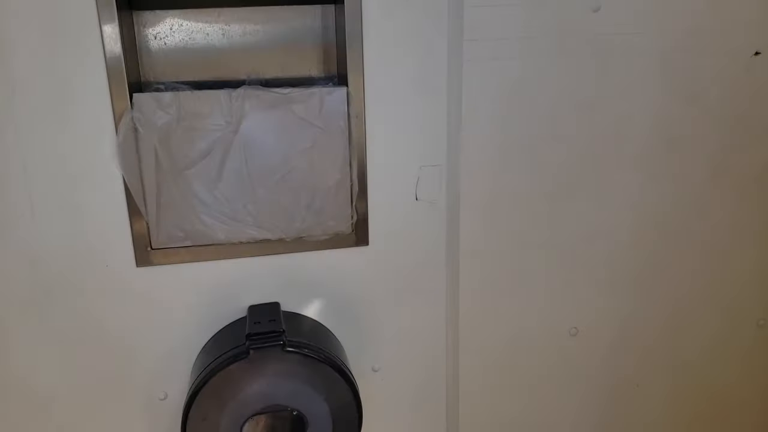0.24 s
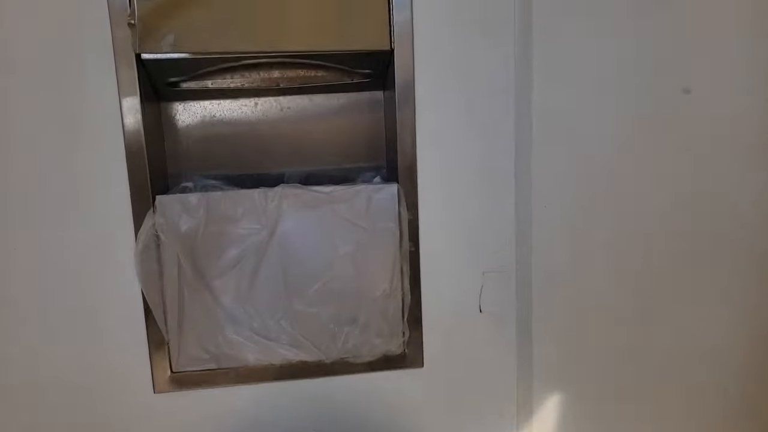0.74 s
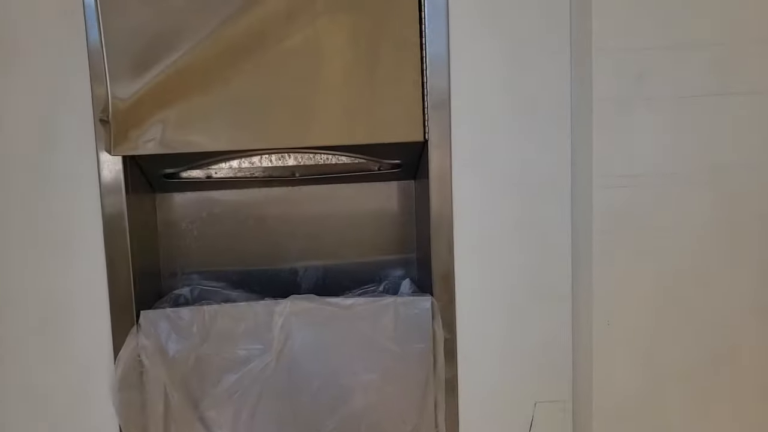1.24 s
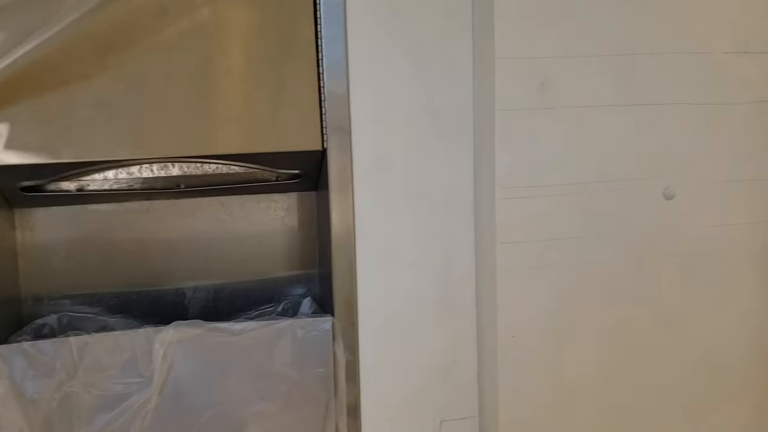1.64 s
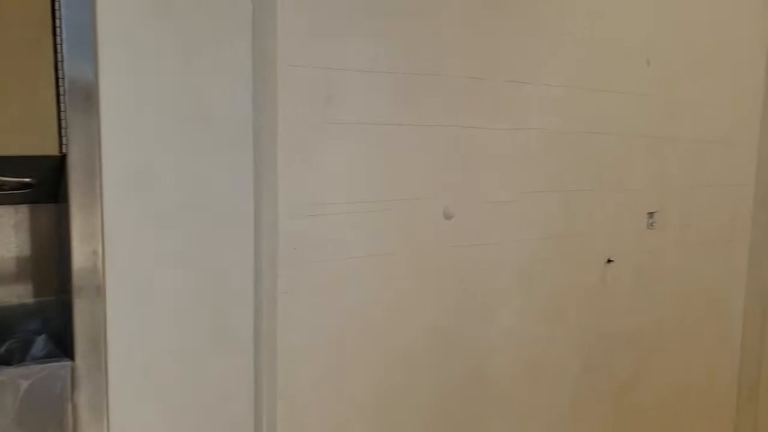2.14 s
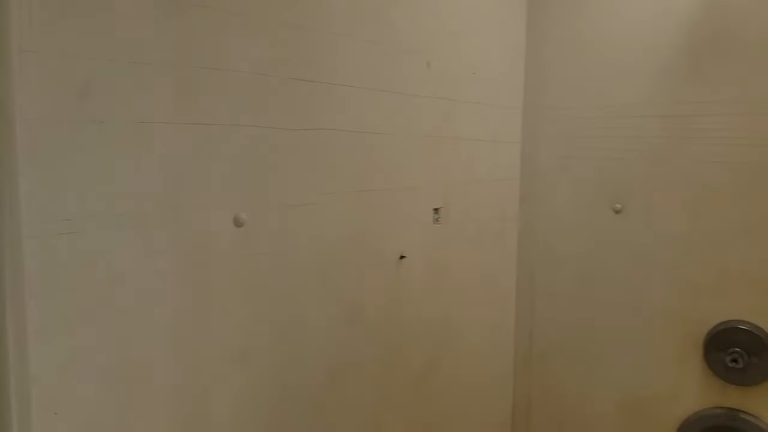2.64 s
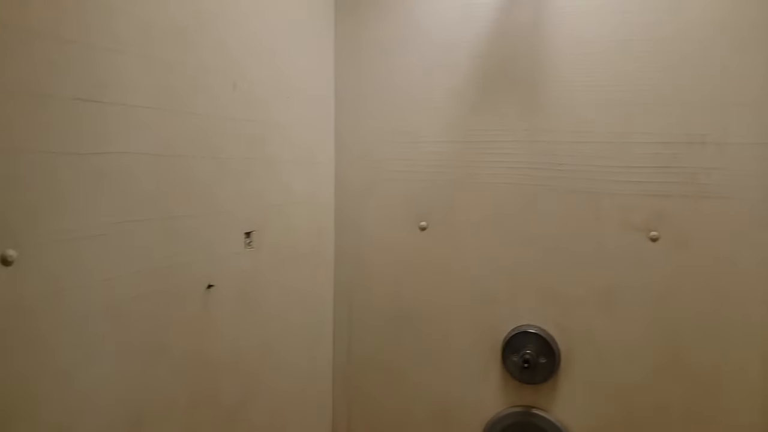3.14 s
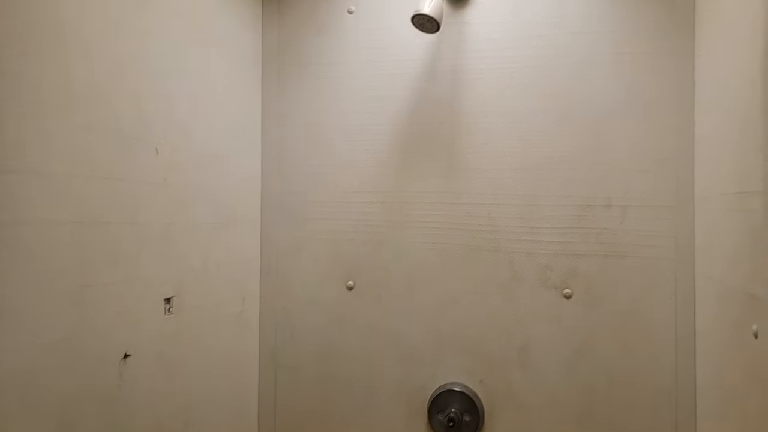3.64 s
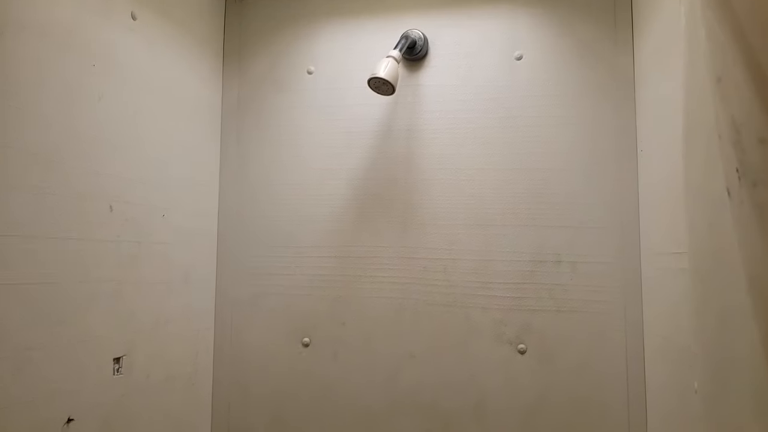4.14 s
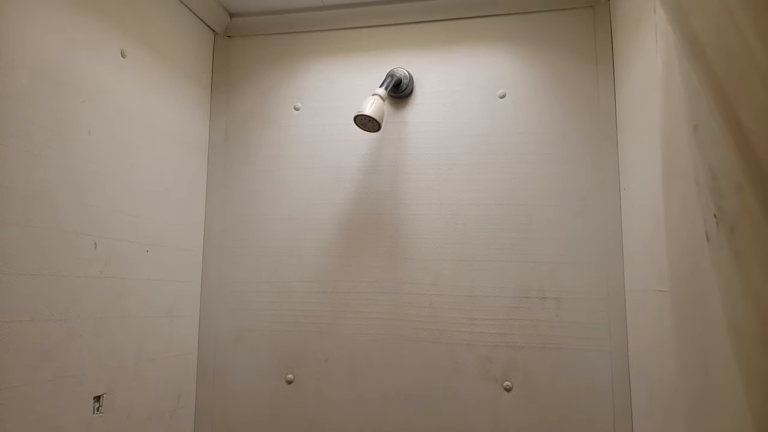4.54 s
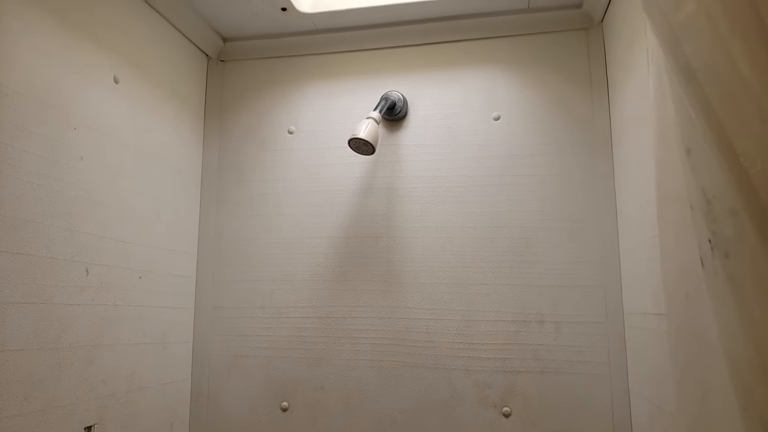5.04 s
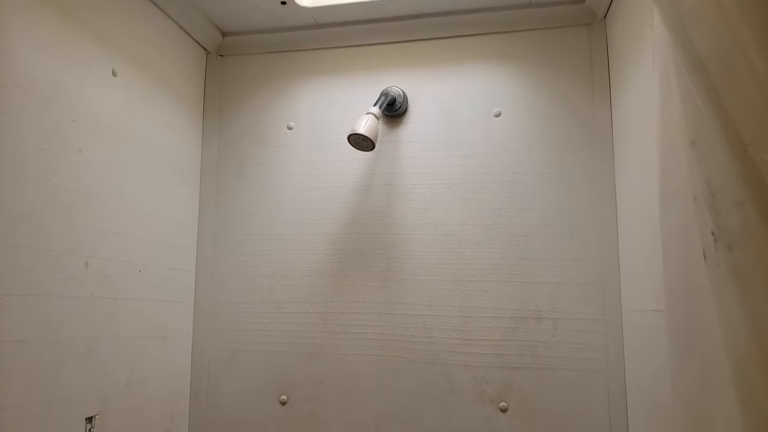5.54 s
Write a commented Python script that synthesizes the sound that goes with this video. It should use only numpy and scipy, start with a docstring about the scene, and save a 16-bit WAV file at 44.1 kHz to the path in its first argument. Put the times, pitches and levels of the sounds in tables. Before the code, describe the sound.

Handheld stereo pickup, close and slightly hissy, in a small reflective shower stall with a steady fan drone. Someone steps up with thumps, small knocks and rustling fabric, then sweeps the curtain aside in about half a second: swish, scraping, a burst of ring clacks, and a loud booming slap on the wall panel. A short ring fades into humming and faint movement.

```python
"""Sweeping a shower curtain aside

Under a humming fan, someone steps up to a shower stall with rustling clothes and sweeps the curtain aside.
The rings scrape and clack along the rod, the sheet swishes, and the bunched curtain knocks on the wall.
Rubbing is noise made of tiny slips, knocks are short bursts of contacts, and hums and booms are sine waves.
The small hard room rings around a hand-held pair of microphones."""
import sys
import numpy as np
from scipy import signal
from scipy.fft import rfft, irfft
from scipy.io import wavfile
from scipy.ndimage import uniform_filter1d

SR = 44100
rng = np.random.default_rng(int(sys.argv[2]) if len(sys.argv) > 2 else 0)


def generate_wav(sig):
    """Save sig (samples, or channels by samples) to the path in sys.argv[1] as 16-bit PCM at SR."""
    pcm = np.round(np.clip(np.atleast_2d(sig).T, -1, 1) * 32767).astype(np.int16)
    wavfile.write(sys.argv[1], SR, pcm)


N = 255780
TIME = np.arange(N) / SR  # s


def amp(db):
    """Turns decibels into gain."""
    return 10 ** (np.asarray(db) / 20)


def evened(x):
    """Scales a sound to rms 1."""
    return x / np.sqrt(np.mean(x ** 2) + 1e-20)


def read(points, hz):
    """Reads a curve over frequency at hz, with straight lines between its points on a log axis."""
    f, value = np.transpose(points)
    return np.interp(np.log(hz + 1), np.log(f + 1), value)


def add(mix, s, sound):
    """Lays a sound into the mix at time s."""
    part = mix[round(s * SR):][:len(sound)]
    part += sound[:len(part)]


def drift(rate_hz):
    """A random wander of rms 1: noise that keeps little above rate_hz."""
    hz = np.fft.rfftfreq(N, 1 / SR)
    spectrum = rfft(rng.standard_normal(N)) * np.exp(-(hz / rate_hz) ** 2)
    return evened(irfft(spectrum, N))


def diffuse(size=N):
    """Spectra of noise from all sides: the two microphones agree mainly in the bass."""
    spacing_m, sound_m_s = .15, 343
    hz = np.fft.rfftfreq(size, 1 / SR)
    same = np.sinc(2 * hz * spacing_m / sound_m_s) * .97
    mid, side = rfft(rng.standard_normal((2, size))) * np.sqrt([1 + same, 1 - same])
    return hz, np.array([mid + side, mid - side])


def causal(db):
    """The promptest response with this spectrum (minimum phase), energy 1."""
    both_sides_db = np.r_[db, db[-2:0:-1]]
    log_gain = np.log(amp(both_sides_db))
    taps = np.fft.ifft(np.exp(np.conj(signal.hilbert(log_gain)))).real
    return taps / np.linalg.norm(taps)


def room(x, lag_ms, wet_db, near_db, near_s=0.0061, left_db=7.0, count=5):
    """Sound arrives directly, then off the walls as a dying noise whose pattern shifts at random.

    A positive lag_ms delays the left microphone, a negative one the right."""
    # how long the room rings: f/Hz, time to fall 60 dB/s
    ring_times = [(100, 0.37), (400, 0.11), (1000, 0.21), (2500, 0.44), (5000, 0.47), (12000, 0.49)]
    t = np.arange(SR // 2) / SR
    direct = np.zeros((2, len(t)))
    direct[0, round(max(lag_ms, 0) * SR / 1000)] = amp(left_db)
    direct[1, round(max(-lag_ms, 0) * SR / 1000)] = amp(-left_db)
    out = signal.fftconvolve(x[None], direct, axes=1)[:, :N]

    # several wall patterns take turns, each with its own wandering share of the sound
    shares = np.array([drift(12) for _ in range(count)])
    for share in shares / np.linalg.norm(shares, axis=0):
        noise = irfft(diffuse(size=len(t))[1])
        f, age, frames = signal.stft(noise, SR, nperseg=256)
        fading = frames * amp(-60 * age / read(ring_times, f)[:, None])
        tail = signal.istft(fading, SR)[1][:, :len(t)]
        near = irfft(diffuse(size=len(t))[1]) * np.exp(-t / near_s)
        late_part = amp(wet_db) * evened(tail * (t > .004))
        early_part = amp(near_db) * evened(near * (t > .0015))
        walls = (late_part + early_part) / np.sqrt(len(t))
        out += signal.fftconvolve((x * share)[None], walls, axes=1)[:, :N]
    return out / np.sqrt(1 + amp(wet_db) ** 2 + amp(near_db) ** 2)


def friction(colour, per_s, spread_db, smooth):
    """Rubbing surfaces: many tiny slips of uneven size over a smooth rub, rms 1."""
    happens = rng.random(N) < per_s / SR
    direction = rng.choice([-1, 1], N)
    size = amp(spread_db * np.minimum(rng.exponential(1, N), 4))
    drive = evened(happens * direction * size) + smooth * rng.standard_normal(N)
    colour_filter = causal(read(colour, np.linspace(0, SR / 2, 2049)))
    return evened(signal.oaconvolve(drive, colour_filter)[:N])


def blows(rows, colour, chatter, size=41):
    """Each blow is one contact and a dying chatter of smaller ones, coloured by the struck body."""
    out = np.zeros(N)
    hz = np.linspace(0, SR / 2, 2049)
    t = np.arange(4096) / SR
    for s, db, tilt_db, chatter_s, *tones in rows:
        contacts = rng.standard_normal(len(t)) * np.exp(-t / max(chatter_s, 1e-4))
        contacts *= chatter / np.linalg.norm(contacts)
        contacts[0] = 1
        body_db = read(colour, hz) + tilt_db * np.log2(np.maximum(hz, 200) / 2000)
        for tone_hz, width_hz, tone_db in np.reshape(tones, (-1, 3)):
            body_db += tone_db / (1 + (2 * (hz - tone_hz) / width_hz) ** 2)
        # the contacts' broad spectrum is evened out, so the broad colour is that of the struck body
        contact_power = uniform_filter1d(abs(rfft(contacts)) ** 2, size)
        contact_db = 10 * np.log10(contact_power)
        hit = signal.fftconvolve(contacts, causal(body_db - contact_db))
        add(out, s, amp(db) * hit / np.linalg.norm(hit))
    return out


def ring_modes(strikes, modes, rise_s):
    """A struck body's own tones (modes) swing up over rise_s at each strike and die away."""
    t = np.arange(SR) / SR
    out = np.zeros(N)
    swing = np.sin(np.pi / 2 * np.minimum(t / rise_s, 1)) ** 2
    tones = sum(amp(db - 60 * t / t60) * np.sin(2 * np.pi * hz * t) for hz, db, t60 in modes)
    for s, db in strikes:
        add(out, s, amp(db) * -swing * tones)
    return out


def swells(rows):
    """Gain of separate rubs, each rising to its peak and falling evenly in dB.

    A row gives the times to rise and fall by 10 dB, or one time for both; the least is 1 ms."""
    power = np.zeros(N)
    for s, db, *times in rows:
        span_s = np.where(TIME < s, times[0], times[-1])
        power += amp(db - 10 * abs(TIME - s) / np.maximum(span_s, 1e-3)) ** 2
    return np.sqrt(power)


def pull(attack_s, growth_db_per_s, release_db_per_s):
    """Gain of the pull: a quick start, a steady change with one snag, a fade once the curtain stops."""
    pull_s, stop_s = 2.419, 3.05
    # the pull slackens once on the way
    snag_s, snag_length_s, snag_depth_db = 2.695, 0.022, -3
    travel_s = np.clip(TIME, pull_s, stop_s) - pull_s
    snag_db = snag_depth_db * np.exp(-((TIME - snag_s) / snag_length_s) ** 2)
    fade_db = release_db_per_s * np.maximum(TIME - stop_s, 0)
    start = np.minimum(travel_s / attack_s, 1)
    return start * amp(growth_db_per_s * travel_s + snag_db - fade_db)


def ventilation():
    """Fan rumble, motor hum and blade tone; tones and air resonances change as the microphones move in."""
    # colour of the rumble: f/Hz, relative level/dB
    rumble_colour = [(15, -8.5), (30, -7), (55, -2.5), (100, -5.5), (150, -0.5), (205, -12), (400, -16),
                     (500, -23.5), (850, -25), (1150, -36), (2000, -46), (8000, -96)]
    # air resonances that the fan excites: f/Hz, width/Hz, level outside the stall/dB, level inside/dB
    air_modes = [(51, 3.9, -50, -61.5), (82.7, 11.6, -58, -51.5), (161.2, 8.1, -54, -53),
                 (337, 15.7, -62.5, -57.5), (764.2, 26.8, -82.5, -58)]
    # how far the microphones are inside the stall: t/s, share (0-1)
    inside_share = [(0, 0.34), (2.2, 0.78), (3.4, 0.94), (5.8, 0.97)]
    # the microphones pass through the standing waves of both tones: t/s, motor level/dB, blade level/dB
    hum_levels = [(0, -54, -44.5), (.8, -55, -48), (1.1, -48.5, -47.5), (3.2, -45.5, -54.5),
                  (4.3, -47.5, -58), (5.8, -50.5, -51.5)]
    motor_hz, blades_hz = 119.3, 170.75

    inside = np.interp(TIME, *np.transpose(inside_share))
    hz, noise = diffuse()
    rumble = evened(irfft(noise * amp(read(rumble_colour, hz)), N))
    out = amp(-46.5) * rumble * amp(.5 * drift(2.4))

    hz, noise = diffuse()
    for mode_hz, width_hz, out_db, in_db in air_modes:
        ringing = evened(irfft(noise / (1 + ((hz - mode_hz) / width_hz) ** 2), N))
        out += ringing * amp(out_db + (in_db - out_db) * inside)

    s, motor_db, blades_db = np.transpose(hum_levels)
    for tone_hz, waver_hz, db in ((motor_hz, .4, motor_db), (blades_hz, 1.0, blades_db)):
        pitch_hz = tone_hz + waver_hz * drift(4.77)
        tone = np.sin(2 * np.pi * np.cumsum(pitch_hz) / SR)
        out += evened(tone) * amp(np.interp(TIME, s, db))
    return out * amp([[.3], [-.3]])  # slightly louder on the left


def hiss():
    """Steady faint noise of each microphone, coloured by its own curve; the left one is much noisier."""
    # colour of each hiss: f/Hz, relative level/dB
    left_colour = [(1000, -17), (2000, -10), (2650, -1), (3200, -2.5), (4500, 3), (5800, 3.5), (7000, -10),
                   (8200, -48), (11000, -18.5), (16000, -18)]
    right_colour = [(1000, -6), (2000, -25), (2650, 12), (3300, -11), (6000, 6), (8200, -26), (11000, -3),
                    (16000, 5.5)]
    hz = np.fft.rfftfreq(N, 1 / SR)
    sides = []
    for colour, level_db in ((left_colour, -65), (right_colour, -80.0)):
        spectrum = rfft(rng.standard_normal(N)) * amp(read(colour, hz))
        sides.append(amp(level_db) * evened(irfft(spectrum, N)))
    return np.array(sides)


def rustling():
    """Clothes rub at each movement and soles shuffle: both are friction that swells and fades."""
    # colour of rubbing clothes, then of shuffling soles: f/Hz, relative level/dB
    cloth_colour = [(200, 2), (900, -16.5), (1600, -6), (2700, 9), (3500, 1.5), (5800, 10.5), (8200, -4),
                    (11500, 5), (16000, 0.5)]
    sole_colour = [(200, 10.5), (700, 8), (1500, 7.5), (2600, -2), (4000, 0.5), (8000, -48), (16000, -45.5)]
    # rustles, one for each movement: peak t/s, relative level/dB, 10 dB rise time/s, 10 dB fall time/s
    rustles = [(0, -69, 0.11, 0.2), (.52, -68.5, 0.08, 0.04), (.82, -67, 0.21, .4),
               (1.035, -60.5, 0.05, 0.06), (1.13, -68.5, 0.5, .25), (2.34, -70, 0.54, 0.38),
               (3.47, -77.5, 1, 0.38), (3.75, -82, .1, 0.6), (4.6, -78, 0.16, 0.13),
               (5.21, -83.5, 0.3, 0.5), (5.8, -79, 0.1, -5)]
    # shuffles of the feet: peak t/s, relative level/dB, time to rise or fall 10 dB/s
    shuffles = [(0, -67, .1), (.93, -61, 0.24), (1.3, -67.5, 0.2), (1.65, -59, 0.05), (1.97, -64, 0),
                (2.3, -58.5, 0.9), (3.5, -65, 0.47), (4.5, -70.5, 0.6), (5.27, -68.5, 0.35),
                (5.8, -63, 0.3)]
    clothes = amp(7.5) * swells(rustles) * friction(cloth_colour, per_s=1500, spread_db=3.0, smooth=0.91)
    feet = swells(shuffles) * friction(sole_colour, per_s=300, spread_db=1, smooth=0.74)
    return room(clothes + feet, lag_ms=.1, wet_db=4.5, near_db=14, left_db=9) * amp([[-.9], [.9]])


def footfalls():
    """Footfalls and knocks on the way are chattering contacts; heels set the floor's low tones booming."""
    # footfalls and knocks: t/s, relative level/dB, brightness/dB per octave, chatter decay/s,
    # body tone f/Hz, clack tone f/Hz, clack tone boost/dB
    steps = [(.493, -28, -1.4, 0.0029, 305, 2890, 11), (.509, -37, -0.1, 0.02, 534, 2980, 11),
             (1.6405, -39, .2, 0.0043, 470, 1640, 24), (1.7945, -37, 1.8, .0047, 910, 4900, 8.5),
             (1.807, -35, -2, .0024, 930, 1700, 21.5), (1.838, -38.5, 0, 0.0023, 110, 1730, 14),
             (2.274, -52.5, 4.5, .0064, 1620, 2430, 20)]
    # colour of a footfall: f/Hz, relative level/dB
    step_colour = [(60, -4), (250, 5.5), (500, -1.5), (900, -1), (1500, -20), (2000, -22.5), (3000, -23),
                   (4000, -25), (6300, -24), (8200, -41), (16000, -45)]
    # heels landing: t/s, relative level/dB
    heels = [(.495, -4.5), (.725, 0), (1.47, 3.5), (1.83, 2.5), (2.17, 1.5)]
    # the floor's boom: f/Hz, relative level/dB, time to fall 60 dB/s
    floor_modes = [(32.8, -47, 0.27), (51.4, -32.5, 0.19), (78.6, -42, 0.14)]
    # the body tone's width is a share of its pitch
    body_width, body_db, clack_width_hz = 0.34, 8.5, 1160
    knocks = []
    for s, db, tilt_db, chatter_s, body_hz, clack_hz, clack_db in steps:
        body_tone = (body_hz, body_width * body_hz, body_db)
        clack_tone = (clack_hz, clack_width_hz, clack_db)
        knocks.append((s, db, tilt_db, chatter_s, *body_tone, *clack_tone))
    impacts = amp(25.5) * blows(knocks, step_colour, chatter=0.71)
    floor = ring_modes(heels, floor_modes, rise_s=0.01)
    return floor + room(impacts, lag_ms=-0.34, wet_db=0.5, near_db=4.0, near_s=0.021, left_db=1.5)


def curtain_sheet():
    """The sheet swishes as friction, fading as it folds up, and its folds flap."""
    # colour of the swish: f/Hz, relative level/dB
    sheet_colour = [(150, 3), (600, 10), (1300, 6.5), (2500, 0.5), (5500, 1.5), (8200, -7), (12000, -1),
                    (16000, -9)]
    # folds flap on the way and as the sheet swings out:
    # peak t/s, relative level/dB, 10 dB rise time/s, 10 dB fall time/s (below 0.001 counts as 0.001)
    flaps = [(2.8145, -45, 0, 0.0073), (3.17, -59.5, -0.32, 0.07), (3.272, -58, -0.56, -0.07)]
    sweep = amp(-53.5) * pull(attack_s=0.077, growth_db_per_s=-4, release_db_per_s=60)
    swish = np.hypot(sweep, swells(flaps))
    sheet = amp(5.5) * swish * friction(sheet_colour, per_s=2300, spread_db=3.5, smooth=0.99)
    return room(sheet, lag_ms=.1, wet_db=5, near_db=17.5, left_db=8.0) * amp([[-.5], [.5]])


def curtain_rings():
    """Rings scrape and tick along the rod, louder as they gather, and skid on after each clack."""
    # colour of scraping along the rod, then of a struck ring: f/Hz, relative level/dB
    scrape_colour = [(150, -12), (400, -3), (800, 11.5), (1300, 2.5), (1900, 1), (2450, -15), (3200, -4),
                     (4600, -11), (6300, -5), (8000, -52), (16000, -39)]
    ring_colour = [(200, 0.5), (800, -1), (1700, -4.5), (2300, 2.5), (3300, -1.5), (4400, 1.5), (5900, -6),
                   (7200, -12.5), (8300, -26), (16000, -32)]
    # rings clacking: t/s, relative level/dB, brightness/dB per octave, ring tone f/Hz, ring tone boost/dB
    clack_rows = [(2.5533, -38, -2, 2470, 11.5), (2.6066, -30, 3.5, 2400, 1.5),
                  (2.6551, -25, 0.5, 2600, 8.5), (2.712, -32, -3.5, 1800, 4), (2.7400, -24, 0, 2320, 2),
                  (2.7668, -30, -1.5, 2140, -7), (2.814, -25.5, 1.5, 2500, 2.5),
                  (2.8464, -27.5, -2, 2610, 9), (2.9256, -34, -4, 2460, 13), (2.9487, -38, 2, 2400, 14),
                  (2.9695, -37, 2, 2560, 14), (2.9818, -29, -1, 1920, 16)]
    # a skid's level is set against its clack; its fall time is for 10 dB
    skid_db, skid_fall_s = -18.5, 0.072
    # a clean clack rings out, a dull one chatters longer: each 10 dB of tone halves the chatter
    base_chatter_s, halving_db, tone_width_hz = 0.0027, 10, 560

    skids = swells([(s, db + skid_db, base_chatter_s, skid_fall_s) for s, db, *_ in clack_rows])
    travel = amp(-47.5) * pull(attack_s=0.13, growth_db_per_s=3, release_db_per_s=135)
    slide = np.hypot(travel, skids)
    scrape = amp(-2.5) * slide * friction(scrape_colour, per_s=700, spread_db=4.0, smooth=0.28)
    ticks = amp(-7.0) * slide * friction(ring_colour, per_s=80, spread_db=1, smooth=0)

    hits = []
    for s, db, tilt_db, tone_hz, tone_db in clack_rows:
        chatter_s = base_chatter_s * .5 ** (tone_db / halving_db)
        hits.append((s, db, tilt_db, chatter_s, tone_hz, tone_width_hz, tone_db))
    clacks = amp(19.5) * blows(hits, ring_colour, chatter=0.63)
    rings = scrape + ticks + clacks
    in_room = room(rings, lag_ms=.41, wet_db=-3.5, near_db=1, near_s=0.01, left_db=0.5)
    return in_room * amp([[.6], [-.6]])


def wall_knock():
    """The bunched rings slap home; the wall panel booms and the rod rings, roughened by the rings on it."""
    # the bunched curtain hits the wall: t/s, relative level/dB, brightness/dB per octave, chatter decay/s
    slap_rows = [(2.9825, -32, 2.5, 0.0075), (2.990, -22, 1, 0.021), (3.004, -23.5, -1, 0.024),
                 (3.165, -46.5, 3.5, 0.0086)]
    # colour of that slap: f/Hz, relative level/dB
    slap_colour = [(60, 17), (250, 8.5), (450, 7.5), (700, 9), (1200, 3.5), (2000, -1), (3000, -3.5),
                   (5500, -5.5), (8200, -18.5), (12000, -16), (16000, -36)]
    # the final blow and its rebound: t/s, relative level/dB
    wall_strikes = [(2.988, -1.5), (3.148, -22)]
    # tones of the wall panel, then of the rod: f/Hz, relative level/dB, time to fall 60 dB/s
    wall_modes = [(47.8, -26, 0.67), (78.4, -41, .4), (95.7, -20, 0.43), (136, -4, 0.079), (146, -49, 0.26),
                  (259, -29, 0.2), (334, -42.5, 0.53)]
    rod_modes = [(2223, -52, .3), (4269, -52, .35), (4370, -52, .35), (4468, -48, .35), (4506, -51, .35),
                 (4620, -51, .35), (4750, -54, .35)]
    # the rings spring back and set the rod ringing: t/s, relative level/dB
    recoil = [(3.05, 2.5)]

    slaps = amp(23.5) * blows(slap_rows, slap_colour, chatter=2.4)
    roughness = .8 + .6 * drift(120)
    rod = ring_modes(recoil, rod_modes, rise_s=.025) * roughness
    boom = ring_modes(wall_strikes, wall_modes, rise_s=0.019)
    slaps_in_room = room(slaps, lag_ms=.41, wet_db=2.0, near_db=1.5, left_db=1.5)
    rod_in_room = room(rod, lag_ms=.2, wet_db=-0.5, near_db=-2, left_db=2)
    return boom + slaps_in_room + rod_in_room


def scene():
    """Everything in the shower room, added together."""
    person = rustling() + footfalls()
    curtain = curtain_sheet() + curtain_rings() + wall_knock()
    return ventilation() + hiss() + person + curtain


def record(dry):
    """The recorder's band limit: a steep filter removes what lies above its edge."""
    edge_hz = 15900
    low_pass = signal.firwin(511, edge_hz, window=("kaiser", 9), fs=SR)
    return signal.oaconvolve(dry, low_pass[None], "same")


dry = scene()
out = record(dry)
generate_wav(out)
```